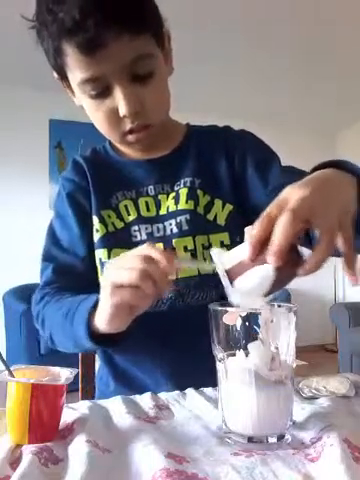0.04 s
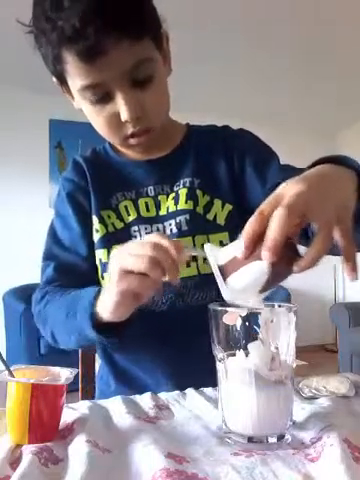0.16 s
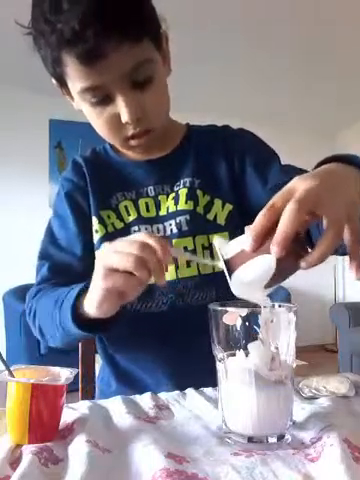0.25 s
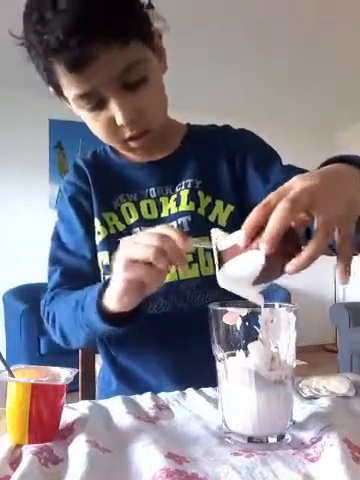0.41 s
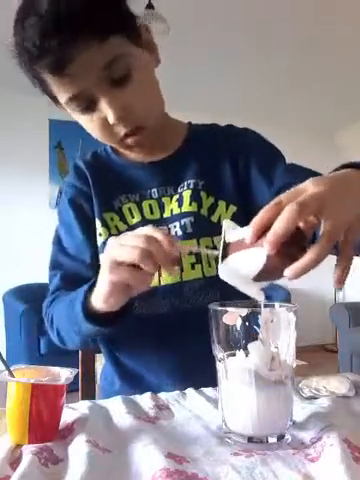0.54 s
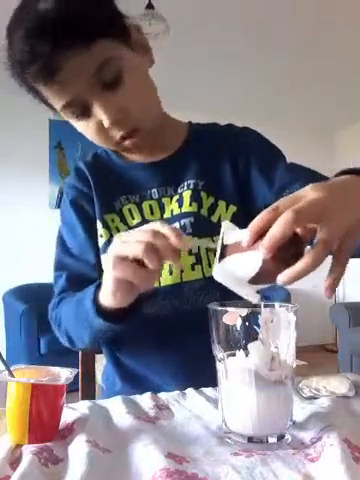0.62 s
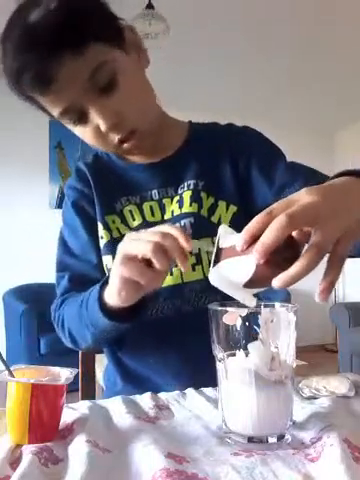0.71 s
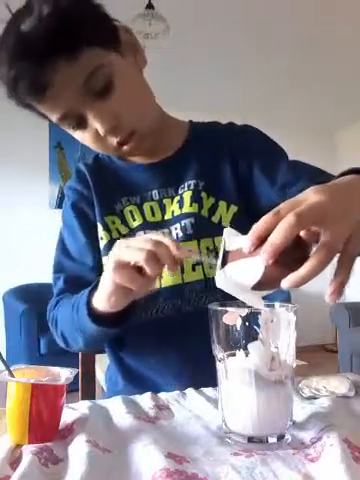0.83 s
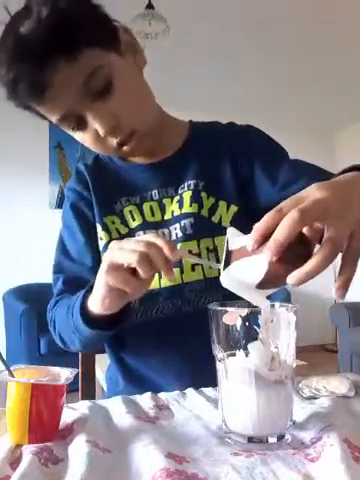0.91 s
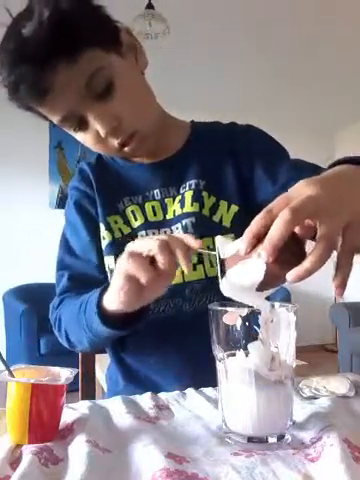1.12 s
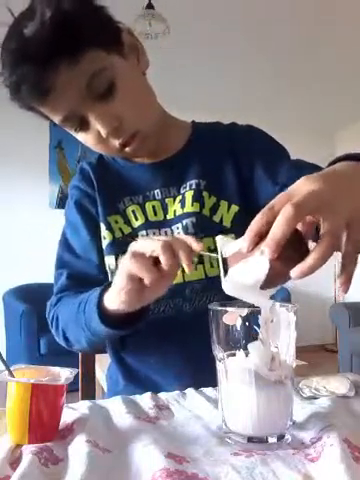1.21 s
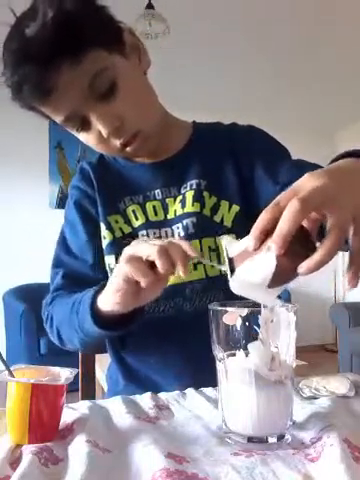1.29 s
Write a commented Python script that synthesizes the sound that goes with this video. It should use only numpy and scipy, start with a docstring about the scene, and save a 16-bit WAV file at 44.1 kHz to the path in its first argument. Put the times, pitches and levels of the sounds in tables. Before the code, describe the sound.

A spoon scrapes soft dessert from a small plastic pot, with ticks and one loud snap

```python
"""A metal spoon scrapes soft dessert out of a small plastic pot in a kitchen, over quiet hiss and hum.
First the tail of an earlier sound dies away, the spoon ticks on the rim, and the pot's wall snaps loudly.
Then come scraping strokes, light ticks and a hollow knock, later soft wet plops and a weaker knock.
Ticks, knocks, plops and the snap are clicks that set dying tones ringing; a scrape is a dense crowd
of tiny clicks. Noise adds the weak tones of each contact and the short ring that follows it."""
import sys
import numpy as np
from scipy import signal
from scipy.fft import rfft, irfft
from scipy.io import wavfile

SR = 44100
rng = np.random.default_rng(int(sys.argv[2]) if len(sys.argv) > 2 else 0)


def master(y):
    """Save y as 16-bit WAV."""
    cut = np.clip(np.atleast_2d(y).T, -1, 1)
    pcm = np.round(cut * 32767)  # scale
    wavfile.write(sys.argv[1], SR, pcm.astype(np.int16))


N = 59535
T = np.arange(N) / SR


def from_db(db):
    """Turn decibels into a plain multiplier."""
    return 10 ** (np.asarray(db) / 20)


def rms_one(x):
    """Scale a sound to an average power of one."""
    return x / np.sqrt(np.mean(x ** 2) + 1e-20)


def at_hz(points, hz):
    """Read between the rows of a table, with frequency on a log scale."""
    f, value = np.transpose(points)
    return np.interp(np.log(hz + 1e-9), np.log(f), value)


def dying(age_s, t60_s):
    """A natural fade: the level falls by 60 dB in t60_s seconds."""
    return np.exp(-np.log(1000) * age_s / t60_s)


def high_pass(x, hz, order=2):
    """Remove the bass, because small objects radiate little of it."""
    return signal.sosfilt(signal.butter(order, hz, "high", fs=SR, output="sos"), x)


def band_pass(x, low, high, order):
    """Keep only the sound between two frequencies."""
    return signal.sosfilt(signal.butter(order, [low, high], "band", fs=SR, output="sos"), x)


def ring(force, modes, pitch=1):
    """An object rings in several tones (modes); each answers a click with a dying sine."""
    out = 0
    for hz, db, t60 in modes:
        radius = from_db(-60 / (t60 * SR))  # how much of the tone is left after one sample
        angle = 2 * np.pi * hz * pitch / SR
        feedback = [1, -2 * radius * np.cos(angle), radius ** 2]
        tone = signal.lfilter([0, np.sin(angle)], feedback, force + 1e-18)
        out = out + from_db(db) * tone
    return out


def contact(s, db, share=0, grate_s=1):
    """Two things touch: a click of force, then a moment of grating, rounded by the soft plastic."""
    contact_hz = 6500  # plastic is soft: the force has little above this
    age = np.arange(N) - int(s * SR)  # in samples
    grate = rng.standard_normal(N) * (age > 0) * np.exp(-np.abs(age) / (grate_s * SR))
    click = age == 0
    force = from_db(db) * (click + share * grate / np.linalg.norm(grate))
    return signal.sosfilt(signal.butter(2, contact_hz, fs=SR, output="sos"), force + 1e-18)


def crack(events, colour):
    """Many weak modes, too dense to tell apart, die away as noise right after each contact."""
    level_db, low, high, t60 = colour
    level = 0
    for s, db, *_ in events:
        level = level + (T > s) * from_db(db + level_db) * dying(np.abs(T - s), t60)
    noise = band_pass(level * rng.standard_normal(N) + 1e-18, low, high, order=4)
    return noise * np.sqrt(SR / 2 / (high - low))  # make up for the power outside the band


# colour of the steady hiss; only its shape counts: f/Hz, level/dB (per Hz)
HISS_COLOUR = [(25, 18.5), (60, -9.5), (130, -9.5), (250, -7), (550, 1), (1100, -4), (2000, -6.5),
               (4000, -16), (7000, -17), (15000, -17)]
# steady tones of the hum: f/Hz, level/dB (rms)
HUM_TONES = [(468.5, -76.5), (586, -76.5), (703, -80)]
HISS_DB, RUMBLE_HZ = -67, 55  # rms level of the hiss, and the frequency below which it is cut


def background():
    """Steady room hiss, made by colouring noise, with the faint hum of an appliance made of sines."""
    colour = from_db(at_hz(HISS_COLOUR, np.fft.rfftfreq(N, 1 / SR)))
    hiss = irfft(rfft(rng.standard_normal(N)) * colour, N)
    hum = 0
    for hz, db in HUM_TONES:
        sine = np.sin(2 * np.pi * (hz * T + rng.random()))
        hum = hum + from_db(db) * np.sqrt(2) * sine  # root 2 turns rms into peak
    return from_db(HISS_DB) * rms_one(high_pass(hiss, RUMBLE_HZ, order=3)) + hum


# fall time of the ring in each band; the top band is a long, faint hiss after each sound: f/Hz, t60/s
RING_FALL = [(200, 0.2), (800, 0.61), (1600, 0.28), (3200, 0.5034), (6000, 0.1249), (14000, 1.5)]
# strength of the ring against the direct sound: f/Hz, level/dB
RING_LEVEL = [(130, -12), (260, -2), (500, -9.5), (800, -5), (1100, -6), (1500, 0.5), (2300, -12.5),
              (3300, -14), (5000, -14.5), (8000, -8), (14000, -3.5)]
FIRST_ECHO_S = 0.0033  # start of the weak early ring
LATE_START_S = 0.0185  # start of the full ring, after a short dip in level
EARLY_DB = -5.5  # early ring against the full ring


def kitchen(x):
    """A weak early ring, then the full one: noise that dies band by band follows each sound."""
    t = T[:SR // 2]
    edges = np.geomspace(120, 17000, 16)
    build = np.where(t > LATE_START_S, 1, from_db(EARLY_DB)) * (t > FIRST_ECHO_S)
    response = 0
    for low, high in zip(edges, edges[1:]):
        hz = np.sqrt(low * high)  # middle of the band
        noise = band_pass(rng.standard_normal(len(t)), low, high, order=3)
        band = noise * build * dying(t, at_hz(RING_FALL, hz))
        band = band / np.linalg.norm(band) * np.sqrt(2 * (high - low) / SR)
        response = response + band * from_db(at_hz(RING_LEVEL, hz))
    return signal.fftconvolve(x, response)[:N]


# wet plops and smacks of the dessert: t/s, level/dB, f/Hz, time to fall by 60 dB t60/s
WET_PLOPS = [(0.7695, -42.5, 418.4, 0.032), (0.7700, -45.5, 1280, .01), (0.8977, -49, 1130, 0.035),
             (0.9412, -46.5, 1213, 0.0175)]
PLOP_GRATE = (0.58, 0.0062)  # grating against the click, decay of the grating in s
PLOP_LOW_HZ = 302.4


def plops():
    """Dessert lands or pulls loose: one damped pocket of air each."""
    air = 0
    for s, db, hz, t60 in WET_PLOPS:
        air = air + ring(contact(s, 0, *PLOP_GRATE), [(hz, db, t60)])
    return high_pass(air, PLOP_LOW_HZ)


# scraping strokes; the first row is the tail of an earlier sound:
# start t/s, rise/s, fall/s, hollow body level/dB, rasp level/dB
SCRAPE_STROKES = [(-0.02, 0.028, 0.095, -48, -53), (0.433, 0.0022, 0.17, -53.5, -55),
                  (0.497, .032, 0.043, -51.5, -55), (0.544, 0.015, 0.026, -72, -59),
                  (0.80, 0.034, 0.3, -67.5, -70.5), (0.869, 0.029, 0.038, -68, -63.5),
                  (1.151, 0.013, 0.018, -59.5, -59), (1.166, 0.0132, 0.019, -59.5, -57.5),
                  (1.265, 0.048, 0.2, -66, -62.5)]
# hollow tones that the scraping excites: f/Hz, level/dB (among themselves), t60/s
BODY_TONES = [(580, -11, .03), (885.6, -1, 0.015), (1336, 0.5, .025), (1529, 3, 0.022), (1900, 0.5, 0.0093)]
# raspy tones that the scraping excites: f/Hz, level/dB (among themselves), t60/s
RASP_TONES = [(2500, -1.5, .004), (3250, -3, 0.0039), (4150, -6, 0.018), (4440, -10, .01),
              (7260, -7.5, 0.0021), (11620, -16, .001)]
STROKE_FALL_DB = 30.5  # drop of a stroke during its fall time
CATCHES_PER_S, CATCH_SPREAD_DB = 2700, 0.5  # average rate of the clicks, unevenness of their strength
SCRAPE_LOW_HZ = 400


def scrapes():
    """In each stroke the spoon's edge catches and slips in dense tiny clicks on the wall."""
    catches = (rng.random(N) < CATCHES_PER_S / SR) * rng.choice([-1, 1], N)
    catches = catches * from_db(CATCH_SPREAD_DB * np.minimum(rng.exponential(1, N), 3))
    body_level = rasp_level = 0
    for start, rise, fall, body_db, rasp_db in SCRAPE_STROKES:
        swell = np.clip((T - start) / rise, 0, 1)
        fade = from_db(-STROKE_FALL_DB * np.maximum(T - start - rise, 0) / fall)
        body_level = body_level + swell * fade * from_db(body_db)
        rasp_level = rasp_level + swell * fade * from_db(rasp_db)
    sound = 0
    for level, modes in ((body_level, BODY_TONES), (rasp_level, RASP_TONES)):
        steady = ring(catches, modes)  # sets the scale, so that only the stroke levels count
        sound = sound + ring(catches * level, modes) / np.std(steady)
    return high_pass(sound, SCRAPE_LOW_HZ)


# the spoon knocks the pot: t/s, level/dB, grating against the click, decay of the grating/s
POT_KNOCKS = [(0.4573, 3, 0.78, 0.0099), (1.1542, -12.5, 1.9, 0.0107)]
# ring of the knocked pot: f/Hz, level/dB, t60/s
POT_TONES = [(394.5, -62, 0.027), (591.5, -39, 0.059), (861, -48, 0.049), (985, -39.5, 0.068),
             (1342, -39, 0.082), (1386, -46, 0.058), (1870, -52, 0.018), (3330, -41, 0.0083),
             (4370, -49, 0.018)]
KNOCK_CRACK = (-38, 418, 1909, 0.0376)  # weak modes: level/dB, lowest f/Hz, highest f/Hz, t60/s
KNOCK_LOW_HZ = 302.4


def knocks():
    """The bowl of the spoon bumps the pot and drags a moment; the pot rings hollow."""
    force = sum(contact(*knock) for knock in POT_KNOCKS)
    pot = ring(force, POT_TONES)
    return high_pass(pot, KNOCK_LOW_HZ, order=3) + crack(POT_KNOCKS, KNOCK_CRACK)


# the spoon ticks on the rim: t/s, level/dB, pitch shift/semitones
RIM_TICKS = [(0.1454, 1, 0), (0.4345, -19, -0.5), (0.5354, -20, -1), (0.5575, -22.5, -.5),
             (0.7701, -23, 0.86), (0.8962, -19.5, 1.2), (0.9016, -20.5, 4), (0.9410, -21.5, -0.5),
             (1.176, -18.5, -2.06)]
# ring of the spoon on the rim, before the pitch shift: f/Hz, level/dB, t60/s
RIM_TONES = [(248.4, -54.5, 0.034), (1300, -50, 0.0074), (2400, -49.5, 0.022), (2560, -42, .03),
             (3580, -41, 0.025), (4300, -37, 0.026), (4370, -45, 0.011), (5500, -60, 0.0086),
             (7500, -54.5, .02)]
TICK_GRATE = (0.9, 0.0044)  # grating against the click, decay of the grating in s
TICK_CRACK = (-40.5, 1999.5, 4700, 0.0429)  # weak modes: level/dB, lowest f/Hz, highest f/Hz, t60/s
SPOON_TONE = (4808, -52, 0.42)  # the spoon's own thin ring: f/Hz, level/dB, t60/s
TICK_LOW_HZ = 170


def ticks():
    """Light bright touches that skid a little; after the first the spoon rings freely until the snap."""
    rim = 0
    for s, db, shift in RIM_TICKS:
        rim = rim + ring(contact(s, db, *TICK_GRATE), RIM_TONES, 2 ** (shift / 12))
    first_s, snap_s = RIM_TICKS[0][0], WALL_SNAPS[-1][0]
    spoon = ring(contact(first_s, 0), [SPOON_TONE]) * (T < snap_s)  # cut short when it meets the wall
    return high_pass(rim, TICK_LOW_HZ, order=3) + spoon + crack(RIM_TICKS, TICK_CRACK)


# the pot wall snaps: t/s, level/dB
WALL_SNAPS = [(0.197, -25), (0.2017, -2.5)]
# ring of the snapping wall: f/Hz, level/dB, t60/s
WALL_TONES = [(559, -30.5, 0.057), (857, -25, .028), (1464, -35.5, 0.042), (1732, -13.5, 0.019),
              (1900, -12.5, .016), (2937, -12.5, 0.013), (3282, -14.5, 0.023), (4418, -15, .012),
              (4640, -18, 0.019), (5030, -41.5, .01), (6720, -39.5, 0.012)]
# weak modes of the snap: level/dB, lowest f/Hz, highest f/Hz, t60/s
SNAP_CRACK = (-16.5, 1900, 5396.5, 0.0006)
SNAP_SPIT = (-44, 7000, 14495.5, 0.02)  # its brightest edge
SNAP_SHUDDER = (-58.5, 171, 360, 0.35)  # low shudder of the hand-held pot
SNAP_SPREAD = (-15, 2100, 5500, 0.0149)  # spreads sideways, heard only through the room
SNAP_LOW_HZ = 520


def snaps():
    """The thin wall gives a little, then snaps through."""
    force = sum(contact(s, db) for s, db in WALL_SNAPS)
    wall = ring(force, WALL_TONES)
    weak_modes = sum(crack(WALL_SNAPS, colour) for colour in (SNAP_CRACK, SNAP_SPIT, SNAP_SHUDDER))
    return high_pass(wall, SNAP_LOW_HZ, order=6) + weak_modes


def scene():
    """All sounds together; the small sounds are given a weaker tail than the snap."""
    small_tail_db = -5.5
    loud = snaps()
    small = knocks() + ticks() + plops() + scrapes()
    into_room = loud + crack(WALL_SNAPS, SNAP_SPREAD) + from_db(small_tail_db) * small
    return (loud + small + kitchen(into_room) + background())[None]


def record(dry):
    """The treble above 15900 Hz is cut steeply."""
    return signal.sosfilt(signal.ellip(10, 0.1, 70, 15900, fs=SR, output="sos"), dry)


dry = scene()
out = record(dry)
master(out)
```